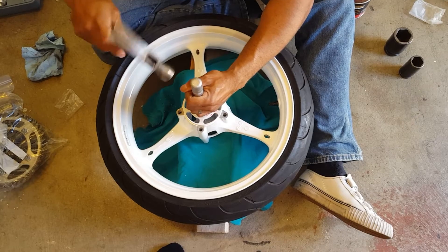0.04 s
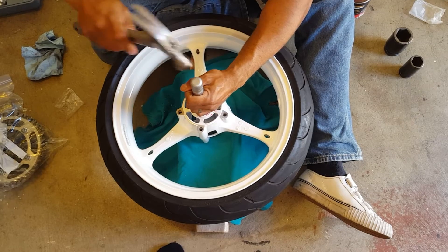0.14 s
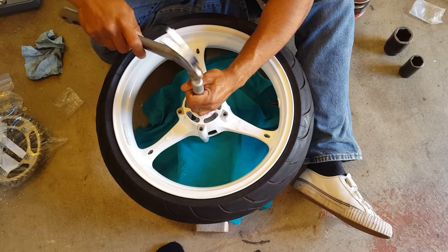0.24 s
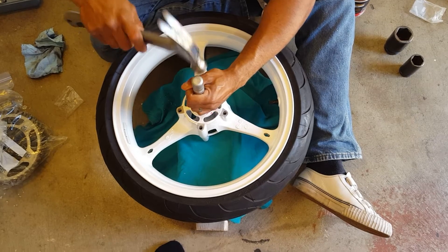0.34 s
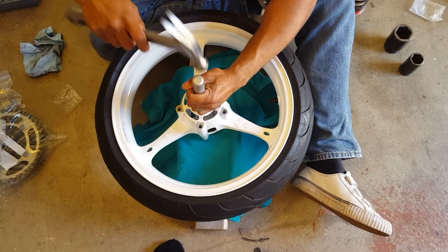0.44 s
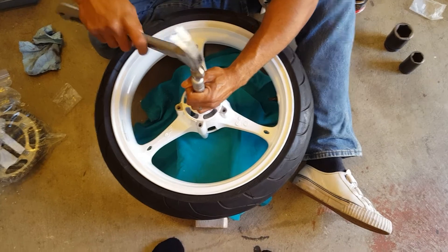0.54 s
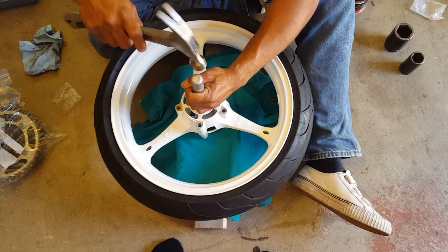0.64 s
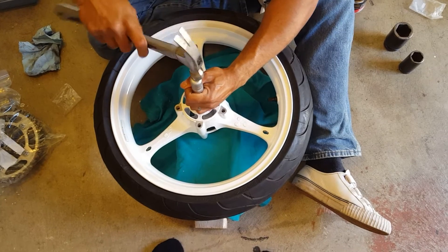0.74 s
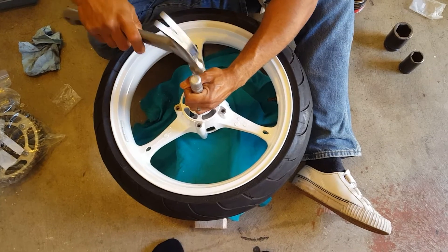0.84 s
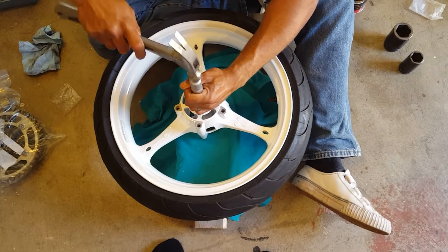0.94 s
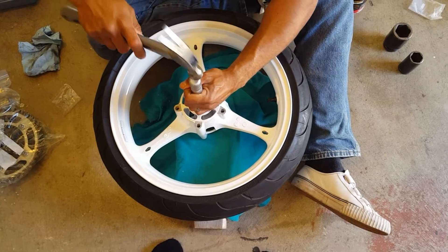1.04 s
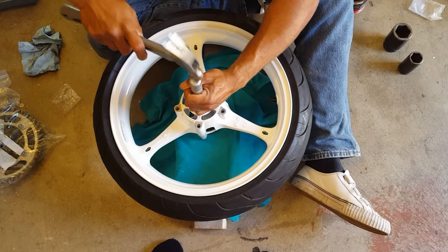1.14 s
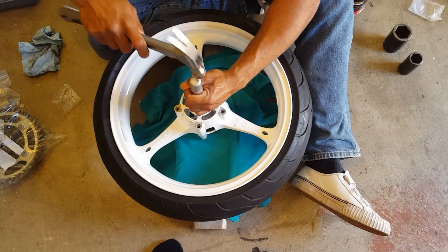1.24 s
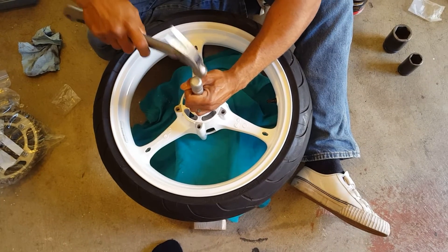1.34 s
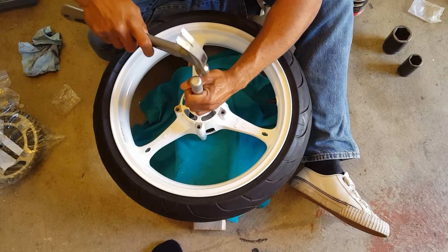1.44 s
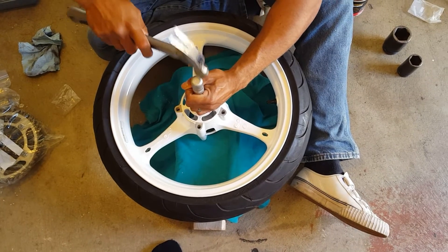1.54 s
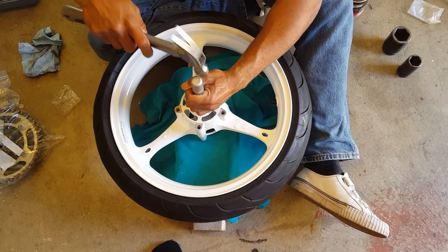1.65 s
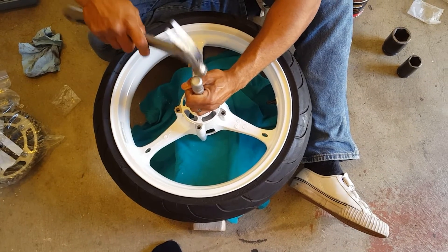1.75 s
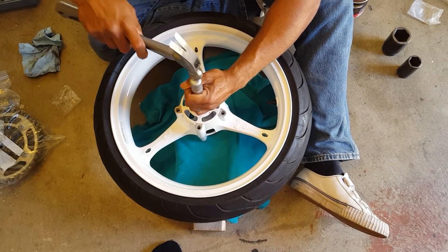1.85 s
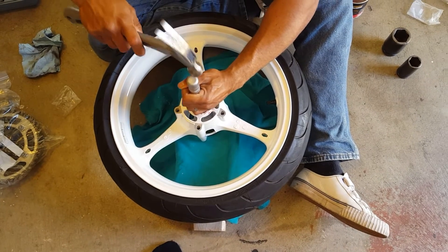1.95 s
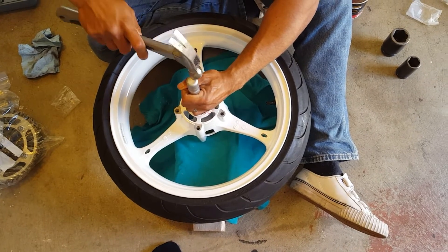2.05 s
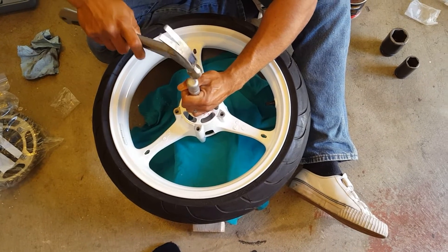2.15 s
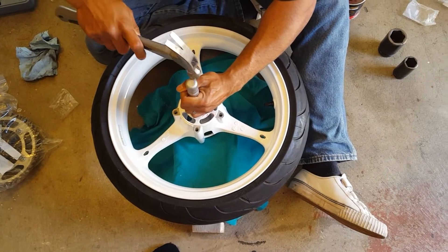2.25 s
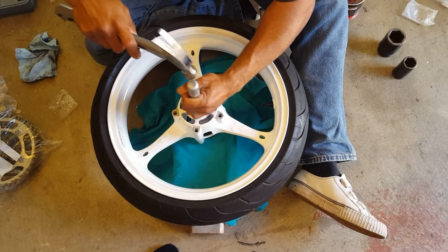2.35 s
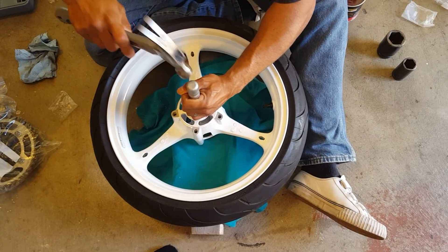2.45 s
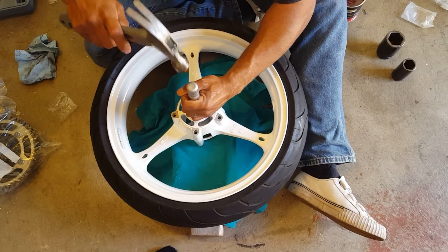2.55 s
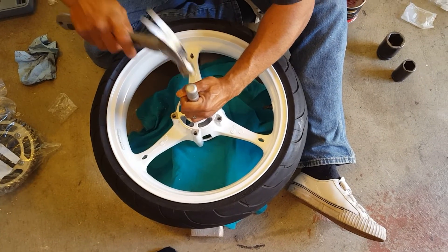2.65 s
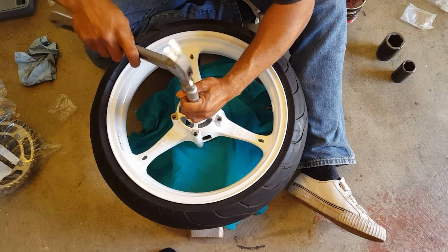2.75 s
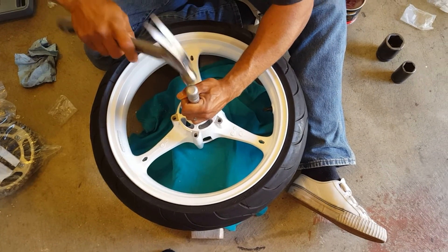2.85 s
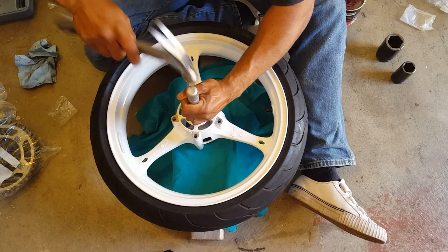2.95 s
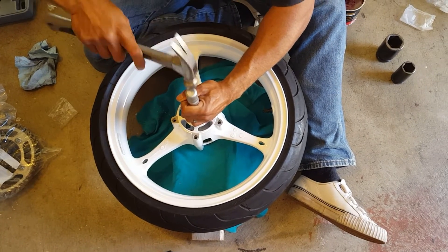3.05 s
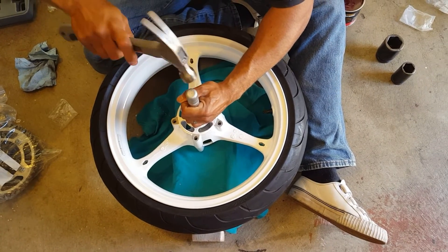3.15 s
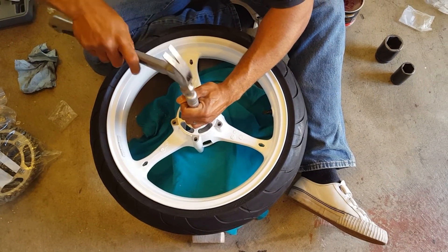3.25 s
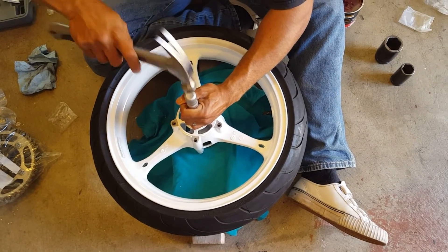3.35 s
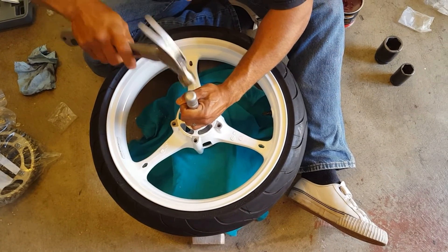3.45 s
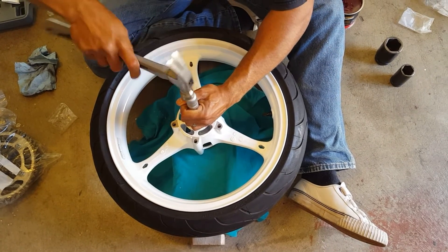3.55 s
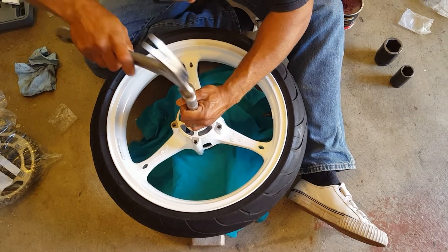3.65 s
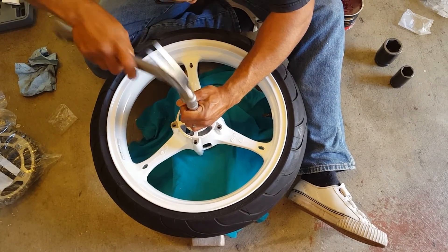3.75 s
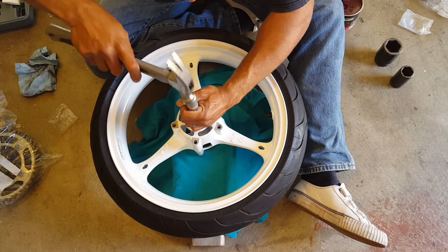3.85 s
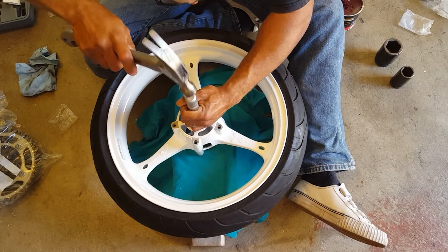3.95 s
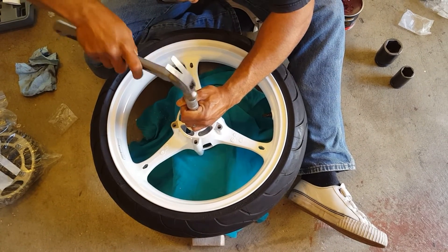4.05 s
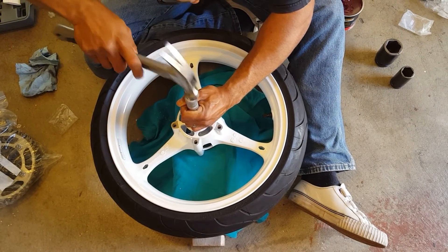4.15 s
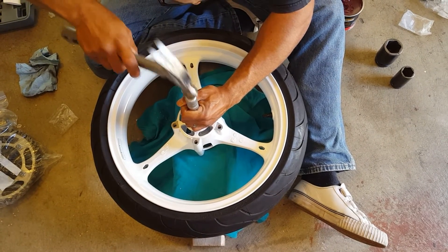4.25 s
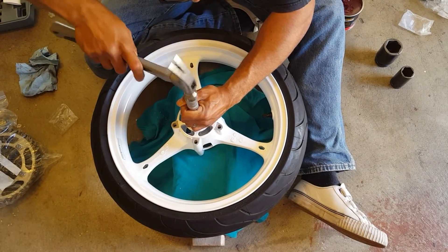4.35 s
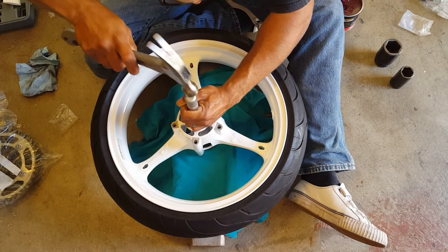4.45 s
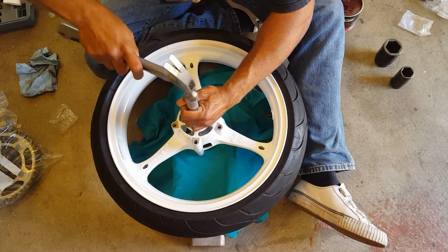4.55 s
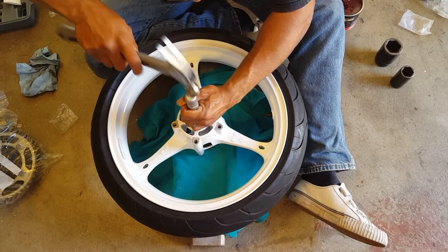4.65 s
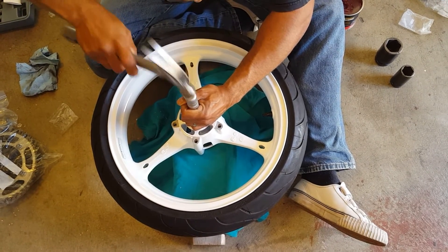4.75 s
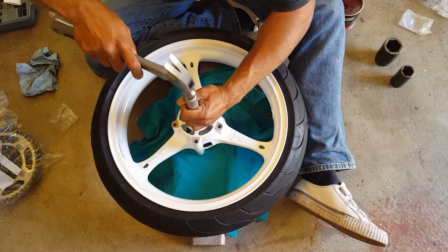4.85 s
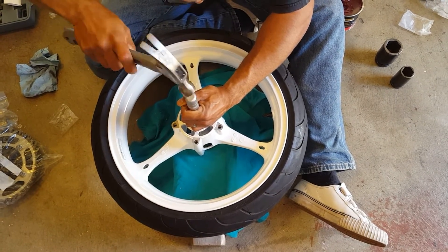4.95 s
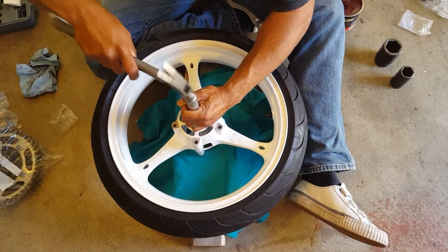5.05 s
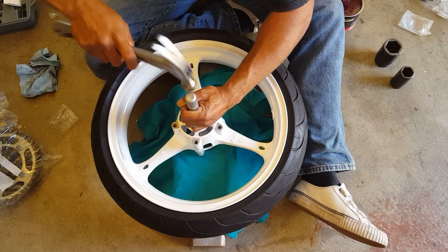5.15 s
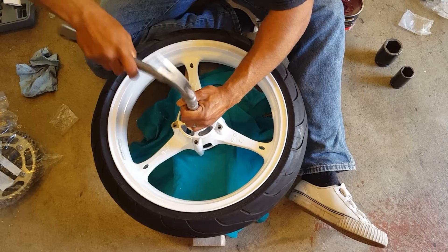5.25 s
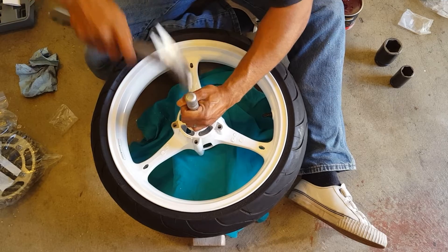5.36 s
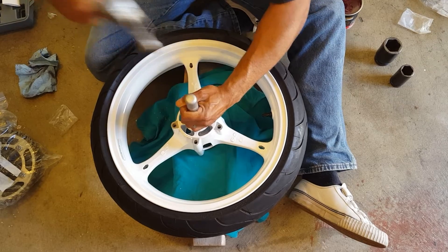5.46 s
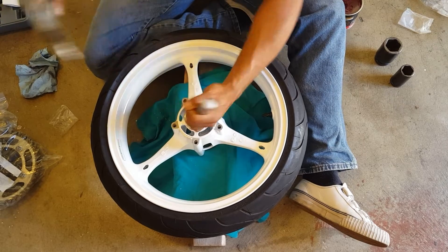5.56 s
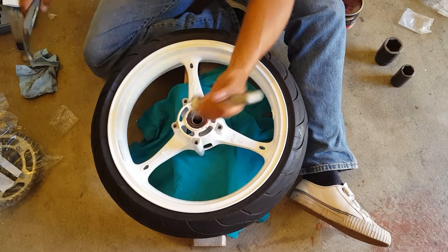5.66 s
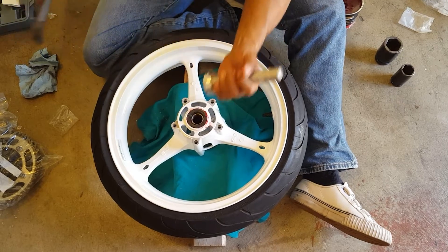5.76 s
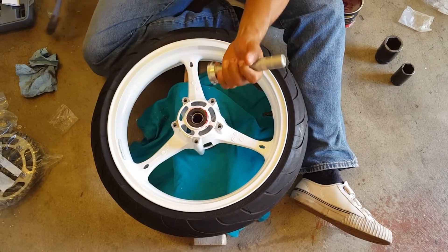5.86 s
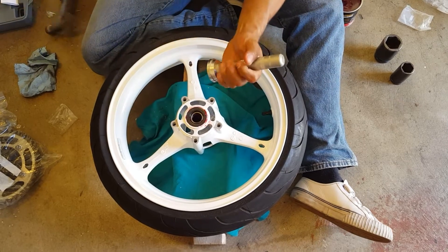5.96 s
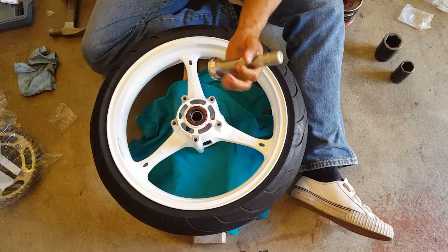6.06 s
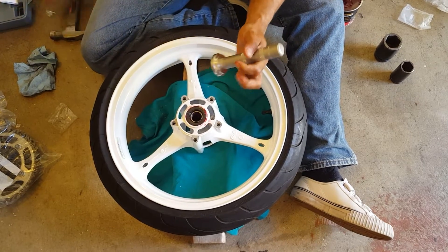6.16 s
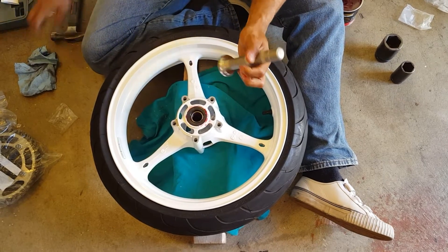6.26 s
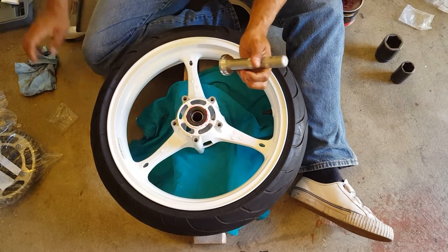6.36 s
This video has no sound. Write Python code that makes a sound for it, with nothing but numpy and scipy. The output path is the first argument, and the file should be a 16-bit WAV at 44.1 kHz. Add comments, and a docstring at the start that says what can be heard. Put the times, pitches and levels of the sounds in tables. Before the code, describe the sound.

For the first half second, small birds chirp and whistle in downward slurs outside, over the low hum and road noise of a distant engine that sinks in pitch and is gone by about 2 seconds. At 0.5 a hammer strikes a hand-held metal driver on a wheel hub, loud and close. Eight blows follow about every 0.2 seconds until 2.0, hollow, with hub clank, spoke boom and short metallic ring. A faint tick at 2.3 fills the pause. From 2.8 to 5.3 eleven more blows land about every quarter second, growing harder, tighter and more solid, with some tyre thump. Each crack gets quick echoes and a diffuse garage tail under a second long. The tail fades, very faint birds sing from 5.7, and from 6.0 to 6.25 the loose driver clinks lightly, brightest near 6.12. Stereo, hard peaks clipped.

```python
"""Hammering a wheel seal home

A claw hammer taps a hand-held metal driver in two runs, seating a seal in the hub of a motorcycle wheel.
Shaped noise makes each crack, fading tones ring the driver and wheel, and a smeared pulse makes the knock.
The knock hardens as the seal goes home, and a bare garage answers with echoes and fading noise.
Then the driver is lifted out and clinks in the hand: short noise ticks with fading tones.
Outside, birds sing in gliding tones, and a distant engine, two tones over road noise, fades."""
import sys
import numpy as np
from scipy import signal
from scipy.fft import rfft, irfft
from scipy.io import wavfile
from scipy.ndimage import uniform_filter1d

SR = 44100
rng = np.random.default_rng(int(sys.argv[2]) if len(sys.argv) > 2 else 0)


def store_pcm(level_fs):
    """Save levels as 16-bit WAV."""
    pcm = np.round(np.clip(level_fs, -1, 1) * 32767).astype(np.int16)
    wavfile.write(sys.argv[1], SR, np.atleast_2d(pcm).T)


N = 282284  # length of the scene in samples

# Levels in the tables are relative: each sound is scaled again when it is mixed.
# road noise that goes with the engine: (frequency [Hz], level [dB])
ROAD_SPECTRUM = [(25, -25), (60, -2), (130, -4), (260, -7.5), (600, -17.5), (1500, -23.5), (3000, -14),
                 (4500, -38.5), (6300, -38.5), (7500, -31), (9500, -53), (12500, -42), (16000, -45.5)]
# the still air: (frequency [Hz], level [dB])
AIR_SPECTRUM = [(25, -19.5), (70, -2), (200, -6), (600, -6), (2500, -22.5), (5000, -25), (16000, -46)]
# one rising bird syllable: (time from its start [s], pitch [Hz], level [dB])
SYLLABLE_POINTS = [(0, 1630, -22.5), (0.016, 1710, -5.5), (0.036, 1796, 0.5), (.041, 2180, 8.5),
                   (0.046, 2645, 2.5), (0.062, 2874, -1.5), (0.075, 3110, 4), (0.081, 3960, -4.5)]
# runs of evenly spaced syllables: (start [s], end [s], level [dB])
CHIRP_RUNS = [(.005, .5, -51), (5.696, 6.05, -62.5)]
# slurred bird whistles: (time [s], length [s], first pitch [Hz], last pitch [Hz], level [dB])
WHISTLES = [(0.001, .036, 2650, 2640, -52), (.222, 0.051, 2950, 2510, -46),
            (0.243, 0.073, 2472, 2377, -36.5), (0.286, 0.047, 2352, 2070, -33.5),
            (0.344, 0.053, 1980, 2173, -40.5), (0.407, 0.077, 2200, 2010, -45),
            (5.845, 0.07, 2615, 2660, -60), (5.893, 0.155, 2353, 2280, -55.5),
            (5.988, 0.14, 3370, 3385, -62)]
# garage reverberation: (frequency [Hz], level [dB], time to fall 60 dB [s],
# likeness of left and right [0-1], left over right before halving and mirroring [dB])
GARAGE_BANDS = [(57.4, -27.5, 0.37, .9, 6.5), (160.3, -3, 0.53, 1, -1.5), (355, 5, 0.46, 0.96, 0.5),
                (720, -2, 0.75, 0.4, 0.5), (980, -4, 0.71, .2, 3), (1380, 1.5, 0.74, .05, 4.5),
                (2307, 0, 0.73, 0.06, -3.5), (4700, 2.5, 0.6, 0, 4), (6460, 1, 0.62, 0.1, -1),
                (10100, -9, 0.36, 0.01, 9), (15300, -3, .35, 0.3, 5.5)]
# hammer blows: (time [s], force [dB], brightness [dB], driver's middle ring [dB], low ring [dB],
# high ring [dB], tyre thump [dB], wheel boom [dB], hub clank [dB], snap [dB])
BLOWS = [ (0.5219, 4.5, -0.5, 4.5, 1.5, -3.5, -6.5, 0, -0.5, 1),
         (0.758, .5, -1, 6, 1.5, -9.5, -7.5, 2.5, 0, -1.5),
         (0.9824, -2, 0.5, -6, -14.5, 3, -9.5, 2.5, 2, 4),
         (1.1890, -1.5, -0.5, 7.5, 2, 14, -17, 2.5, 0, -2),
         (1.3994, 0.5, -10, -25.5, 2, 1.5, -13.5, 1.5, -1.5, -7.5),
         (1.5962, -5, -2, 3, -3.5, -0.5, -21, 6.5, 1, -0.5),
         (1.812, -.5, -2.5, -1, -1, 6.5, -5.5, -1, -6, 3), (2.0303, -6.5, 2, 6.5, 12, -2, -26, 3.5, -3, 4),
         (2.2919, -25, -24, -14, -18, -16, -21.5, 4, -15, 3),
         (2.783, -3, 0.5, 6.5, 2, 10, -6, -1.5, 2.5, 1),
         (3.0476, 0.5, -3, -22, 4.5, 5, -11, -0.5, 3.5, 0.5),
         (3.3124, 0, -2.5, -14.5, 3.5, 3.5, 0, 2.5, 3.5, -2.5),
         (3.5790, 1, -1.5, -15.5, 0, 9.5, 1.5, 2.5, 4, -0.5), (3.8399, 1.5, -2, -6.5, 4, 8, 0, 4.5, 0.5, 7),
         (4.1024, 1.5, -0.5, -17, 2.5, 9, -11, 0.5, 2.5, -2),
         (4.3525, 1.5, -1, -14, 5, 3.5, -4.5, 1.5, 2, 1),
         (4.598, 2, -0.5, -23.5, 4, 0.5, -1.5, 2, 1.5, 0.5), (4.8465, 3, -1, -9, -9, -2, 5, -0.5, 3, 3),
         (5.0846, 4, -0.5, -12.5, -9, -13.5, 4.5, -1.5, -1.5, -0.5),
         (5.323, 2.5, -4, 0, -30, 1.5, -13, 1.5, -2.5, 5)]
# how far the seal is seated: (time [s], seating [0 sliding - 1 home])
SEATING = [(.52, 0.097), (1.6, 0.13), (2.78, 0.15), (3.05, 0.61), (3.84, 0.87), (4.35, 1), (5.08, 1),
           (5.32, 0.97)]
# colour of a blow while the seal still slides: (frequency [Hz], level [dB])
SLIDING_COLOUR = [(100, -18.5), (160, -6), (250, -3), (400, 4), (750, 5), (1050, -1.5), (1400, -4),
                  (1600, -6), (2100, 5), (2700, -6.5), (3300, -6), (4400, -9), (5200, -11.5), (6000, -6),
                  (7300, -6.5), (8100, -10.5), (8700, -32), (9900, -35.5), (12500, -20.5), (16000, -31)]
# colour of a blow once the seal is home: (frequency [Hz], level [dB])
SEATED_COLOUR = [(100, -26.5), (170, -8.5), (260, -15.5), (345, -3), (420, -1.5), (750, 2.5), (1150, 3),
                 (1450, -1), (1740, -9.5), (2000, -4.5), (2250, -6), (2850, -6), (3250, -14), (3900, -16),
                 (5600, -9.5), (7400, -6.5), (8700, -10.5), (9900, -38), (12000, -19), (16000, -31.5)]
# broad resonances each blow stirs, in the order boom, clank, snap: (frequency [Hz], width [octaves])
FORMANTS = [(300, 0.28), (2050, 0.19), (3350, 0.12)]
# tones of the driver, in low, middle and high groups plus an overtone of the low group:
# (frequency [Hz], level [dB], time to fall 60 dB [s])
DRIVER_MODES = [(4662, -10, .036), (4805, -9.5, .036), (5780, -6, .018), (5945, -1.5, .033),
                (6015, -3, .033), (6170, -4.5, .028), (7240, -8, .025), (7345, -4.5, .04),
                (7480, -10, .025), (8790, -20, .06)]
# borders between those groups: (frequency [Hz])
DRIVER_GROUP_EDGES = [5300, 6700, 8200]
# tones of the wheel, booming spokes below and ringing rim above:
# (frequency [Hz], level [dB], time to fall 60 dB [s])
WHEEL_MODES = [(147.5, -25, 0.095), (165.4, -16.5, 0.13), (243, -18.5, 0.04), (280, -26.5, 0.041),
               (360, -7.5, 0.087), (402, -6, 0.08), (524, -20, 0.034), (616, -11, 0.06), (736, -16, 0.11),
               (1234, -12, 0.13), (1434, -9, 0.032), (1908, -19, 0.15), (1965, -12, 0.039),
               (2264, -18, 0.067), (2496, -11, 0.025), (2535, -16.5, 0.11), (2842, -21.5, 0.031)]
# clank of the hub around a seal that still slides: (frequency [Hz], level [dB], time to fall 60 dB [s])
HUB_MODES = [(2300, 0, 0.0047), (2220, 5, 0.033)]
# the clank's returns from the roof, lower the second time: (delay [s], frequency [Hz], level [dB])
ROOF_CLANGS = [(.037, 1975, -19.5), (.063, 1901, -22.5)]
# early echoes off the floor, the ceiling and the far wall: (delay [s], gain [times])
EARLY_ECHOES = [(.0083, 0.32), (0.0148, 0.23), (0.0646, .14)]
# the loose driver head clinking on its handle:
# (time [s], level [dB], low ring [dB], high ring [dB], brightness [dB])
CLINKS = [(2.2917, -16, -20, -19, -12), (6.033, -27.5, -6, -10, -26), (6.073, -27.5, -5, -7, -24.5),
          (6.12, -8.5, 10, 13, 8), (6.1504, -31, 15, 11, -3), (6.176, -14, -6, 1, 2),
          (6.199, -19.5, 19, 9, 13), (6.2024, -13.5, 10, 8, 5), (6.2325, -36, 30, 10, 2),
          (6.249, -22, 19, 8, 17.5)]
# colour of a clink: (frequency [Hz], level [dB])
CLINK_COLOUR = [(150, -22), (600, -7), (1500, -9.5), (2700, -6), (4000, -10.5), (7400, -21), (9900, -40.5),
                (12500, -35), (16000, -40)]
# colour of the left microphone against the right: (frequency [Hz], left over right [dB])
MICROPHONE_BALANCE = [(100, 0), (400, 1.5), (800, -0.5), (1300, -5), (2300, -5), (3200, -7), (4600, -3.5),
                      (8000, 1.5), (14000, 4.5)]

ENGINE_START_HZ, ENGINE_SAG_HZ_PER_S = 78.3, 1.7  # the distant engine's firing rate sinks steadily
ENGINE_START_DB, ENGINE_FADE_DB_PER_S = -52, 5.5  # shared level of hum and road noise; it recedes steadily
ENGINE_GONE_S, ENGINE_GONE_DB_PER_S = 1.68, 17.5  # from this moment it also drops out of earshot
CHIRP_PERIOD_S = 0.141
WHISTLE_ATTACK_S, WHISTLE_RISE_DB, WHISTLE_FADE_DB = 0.013, 19, 8  # a quick swell, then a slow fade
WHEEL_SLIDING_DB, WHEEL_HOME_DB = -9.5, -21.5  # spoke boom at first, and once the hub is stiff
WHEEL_STIFF_AT = 0.3  # share of seating at which the seal has stiffened the hub
RIM_FROM_HZ, RIM_SLIDING_DB, RIM_HOME_DB = 1000, -21.5, -17  # a home seal passes blows into the wheel
WHEEL_RISE_S = 0.0007  # the wheel's tones swell in softly over a fraction of a millisecond
CLANG_RISE_S, CLANG_T60_S = 0.0029, 0.066
DRIVER_DB, ROOM_WANDER = -16.5, 0.5  # driver ring under a blow; how much each blow's room shares vary
HIT_SIZE, LEAD = 32768, 256  # samples in one strike, and samples kept free before its contact
TOP_HZ = 16100

T = np.arange(N) / SR
AGE = np.maximum(np.arange(HIT_SIZE) - LEAD, 0) / SR  # seconds since contact
HIT_HZ = np.fft.rfftfreq(HIT_SIZE, 1 / SR)
TREBLE = np.clip(np.log(HIT_HZ / 2500 + 1e-9) / np.log(3), 0, 1)  # the shelf that brightness lifts


def undb(db):
    """Turn decibels into gain."""
    return 10 ** (np.asarray(db) / 20)


def along(hz, table, axis=1):
    """Read a table column, spacing frequencies the way the ear spaces pitch."""
    rows = np.array(table, float)
    return np.interp(np.log(hz + 1), np.log(rows[:, 0]), rows[:, axis])


def pan(db):
    """Left and right gains for a level difference."""
    return undb(np.array([[db], [-db]]) / 2)


def colour(x, db):
    """Filter with a gain per frequency, letting nothing sound before its cause."""
    # folding the cepstrum puts the whole response after the impulse
    cepstrum = irfft(np.log(undb(db)))
    cepstrum[1:HIT_SIZE // 2] *= 2
    cepstrum[HIT_SIZE // 2 + 1:] = 0
    return irfft(rfft(x) * np.exp(rfft(cepstrum)))


def even(x, size):
    """Spectrum of a noise with its broad random humps levelled."""
    spectrum = rfft(x)
    power = uniform_filter1d(np.abs(spectrum) ** 2, size)
    return spectrum / np.sqrt(power)


def noise(spectrum, spread):
    """Steady stereo noise: a shared middle part of unit level, plus a part opposite on each side."""
    gain = undb(along(np.fft.rfftfreq(N, 1 / SR), spectrum))
    mid, side = irfft(rfft(rng.standard_normal((2, N))) * gain, N)
    return (mid + spread * side * np.array([[1], [-1]])) / mid.std()


def street():
    """An engine hums as two tones over road noise, sinking away and leaving still air."""
    phase = 2 * np.pi * np.cumsum(ENGINE_START_HZ - ENGINE_SAG_HZ_PER_S * T) / SR
    extra_fade_db = ENGINE_GONE_DB_PER_S * np.maximum(T - ENGINE_GONE_S, 0)
    level_db = ENGINE_START_DB - ENGINE_FADE_DB_PER_S * T - extra_fade_db
    hum = np.sin(phase) + undb(-5.5) * np.sin(2 * phase)
    road = noise(ROAD_SPECTRUM, spread=0.55)
    air = noise(AIR_SPECTRUM, spread=0.6)
    return undb(level_db) * (undb(3.0) * hum + undb(1.0) * road) + undb(-69.5) * air


def whistle(points, waver=0.005):
    """A near-pure bird note gliding through its points with a slight tremor of pitch."""
    s, hz, db = np.transpose(points)
    t = T[(T >= s[0]) & (T < s[-1])]
    tremor = np.interp(t, np.linspace(s[0], s[-1], num=16), rng.standard_normal(16))
    pitch = np.interp(t, s, hz) * (1 + waver * tremor)
    tone = np.sqrt(2) * np.sin(2 * np.pi * np.cumsum(pitch) / SR)
    note = tone * undb(np.interp(t, s, db)) * signal.windows.tukey(len(t), 0.1)
    start = np.searchsorted(T, s[0])
    return np.pad(note, (start, N - start - len(t)))


def slur(s, length, first_hz, last_hz, db):
    """One whistle: a straight glide that swells and fades."""
    ages = np.array([0, min(WHISTLE_ATTACK_S, length / 2), length])
    hz = first_hz + (last_hz - first_hz) * ages / length
    levels_db = [db - WHISTLE_RISE_DB, db, db - WHISTLE_FADE_DB]
    return whistle(np.transpose([s + ages, hz, levels_db]))


def birds():
    """Sum the birds' gliding tones: runs of rising chirps, and slurred whistles."""
    song = np.zeros(N)
    for start, end, db in CHIRP_RUNS:
        for s in np.arange(start, end, CHIRP_PERIOD_S):
            song += whistle(np.array(SYLLABLE_POINTS) + [s, 0, db])
    for row in WHISTLES:
        song += slur(*row)
    return song


def garage(x, count=24, size=130):
    """Many mingled echoes, made from noise, build up quickly and die away band by band."""
    t = np.arange(SR) / SR
    hz = np.fft.rfftfreq(SR, 1 / SR)
    centres = np.geomspace(GARAGE_BANDS[0][0], GARAGE_BANDS[-1][0], count)
    # level the noise under a fading weight, so no single pitch stands out
    fade = np.exp(-10 * t)
    weighted = np.pad(rng.standard_normal((2, SR)) * fade, ((0, 0), (0, SR)))
    echoes = irfft(even(weighted, size))[:, :SR] / fade
    white = rfft(echoes / echoes.std())
    response = np.zeros((2, SR))
    for centre, pick in zip(centres, np.eye(count)):
        db, t60, alike, lean_db = (along(centre, GARAGE_BANDS, axis=k) for k in range(1, 5))
        band = np.interp(np.log(hz + 1), np.log(centres), pick)
        mid, side = irfft(white * band, SR)
        pair = np.sqrt(1 + alike) * mid + np.sqrt(1 - alike) * side * np.array([[1], [-1]])
        response += undb(db) * pan(lean_db) * pair * np.exp(-np.log(1000) * t / t60)
    response *= 1 - np.exp(-t / 0.011)
    return undb(-35) * signal.fftconvolve(x[None], response, axes=1)[:, :N]


def burst(rise_s, fall_s, size=400):
    """Crowded metal tones, made as noise dying within milliseconds, different towards each side."""
    swell = (1 - np.exp(-AGE / rise_s)) * np.exp(-AGE / fall_s)
    return irfft(even(rng.standard_normal((2, HIT_SIZE)) * swell, size)) * (AGE > 0)


def ring(modes, scatter_db, detune=0.0007, gains_db=0):
    """Fading tones with their own extra gains; level and pitch vary a little at each strike."""
    hz, db, t60 = np.array(modes, float).T[:, :, None]
    pitch_chance, level_chance = rng.standard_normal((2, len(modes), 1))
    sign = (-1) ** np.arange(len(modes))[:, None]
    tones = np.sin(2 * np.pi * hz * (1 + detune * pitch_chance) * AGE)
    waves = tones * np.exp(-np.log(1000) * AGE / t60)
    level_db = db + np.reshape(gains_db, (-1, 1)) + scatter_db * level_chance
    return np.sum(sign * undb(level_db) * waves, axis=0)


def add(track, sound, s):
    """Mix a strike into a track at its time, its far end faded out."""
    start = int(round(s * SR)) - LEAD
    fade = np.minimum(np.linspace(2, 0, HIT_SIZE), 1) ** 2
    part = (sound * fade)[..., :N - start]
    track[..., start:start + part.shape[-1]] += part


def bending_wave(travel_s):
    """An impulse after crossing the spokes: low notes arrive later; travel_s is the delay at 1 kHz."""
    turns = HIT_HZ * LEAD / SR + 2 * travel_s * np.sqrt(HIT_HZ * 1000)
    return irfft(np.exp(-2j * np.pi * turns))


def formants(gains_db):
    """Bell-shaped lifts or dips, in dB, where broad resonances speak."""
    total_db = np.zeros(len(HIT_HZ))
    for db, (hz, width) in zip(gains_db, FORMANTS):
        octaves_away = np.log2((HIT_HZ + 1) / hz)
        total_db += db * np.exp(-np.square(octaves_away / width) / 2)
    return total_db


def crack(seated, shape_db):
    """Steel meets the driver in a noise burst; a later one joins as the seal seats."""
    # with the seal home, the driver bottoms on the hub just after the first contact
    bottoming = np.roll(burst(rise_s=0.0015, fall_s=0.0069), int(0.002 * SR), axis=1)
    first = burst(rise_s=0.00031, fall_s=0.0034)
    contact = (1 - 0.13 * seated) * first + 0.52 * seated * bottoming
    return undb(21.5) * colour(contact, shape_db)


def knock(shape_db):
    """The blow crosses the spokes as a smeared pulse, plus a later one of chance strength."""
    # no two blows land quite square
    late = 0.29 * rng.standard_normal() * bending_wave(travel_s=0.00345)
    return undb(17.0) * colour(bending_wave(travel_s=0.00177) + late, shape_db)


def driver(low_db, middle_db, high_db):
    """The driver's ring; the grip and the point of contact decide which group of tones speaks."""
    group = np.digitize(np.array(DRIVER_MODES)[:, 0], DRIVER_GROUP_EDGES)
    gains_db = np.array([low_db, middle_db, high_db, low_db])[group]  # the overtone follows the low group
    return ring(DRIVER_MODES, scatter_db=1.5, detune=0.003, gains_db=gains_db)


def wheel(seated, boom_db):
    """Spokes boom less and the rim rings more as the seal stiffens the hub."""
    spokes_db = np.interp(seated, [0, WHEEL_STIFF_AT], [WHEEL_SLIDING_DB, WHEEL_HOME_DB])
    rim_db = RIM_SLIDING_DB + seated * (RIM_HOME_DB - RIM_SLIDING_DB)
    gains_db = np.where(np.array(WHEEL_MODES)[:, 0] < RIM_FROM_HZ, spokes_db + boom_db, rim_db)
    swell_in = 1 - np.exp(-AGE / WHEEL_RISE_S)
    return swell_in * ring(WHEEL_MODES, scatter_db=3.5, detune=0.009, gains_db=gains_db)


def tyre():
    """Two heavily damped low tones, and a low puff of air that differs at each microphone."""
    thump = undb(-33.0) * ring([(60.5, -3.0, 0.029), (191, -4.5, 0.025)], scatter_db=9.0)
    air = burst(rise_s=0.0024, fall_s=0.0075, size=110)
    puff = undb(13.0) * colour(air, -20 * np.log10(1 + (HIT_HZ / 90) ** 2))
    return thump, puff


def hub_clank(near, s, seated, force_db, clank_db):
    """While the seal slides, the hub mouth beams two short tones up and the roof returns clangs."""
    # force counts twice over: hard blows clank more
    level_db = 2.0 * force_db + clank_db - 17.0
    add(near, undb(level_db) * (1 - seated) * ring(HUB_MODES, scatter_db=1.5, detune=0.011), s)
    for delay, hz, db in ROOF_CLANGS:
        tone = ring([(hz, db, CLANG_T60_S)], scatter_db=0.5, detune=0.0058)
        clang = (1 - np.exp(-AGE / CLANG_RISE_S)) * tone
        add(near, undb(force_db + clank_db / 2) * (1 - seated) * clang, s + delay)


def facing(count):
    """Uneven shares of a blow sent to each wall, leaning to the first; their power sums to one."""
    shares = np.eye(count)[:, :1] + ROOM_WANDER * rng.standard_normal((count, 1))
    return shares / np.linalg.norm(shares)


def hammer(split_hz=1400, count=4):
    """Each blow strikes driver, hub, wheel and tyre; returns the near sound and each wall's share."""
    near, sent = np.zeros((2, N)), np.zeros((count, N))
    # the wheel radiates the low notes, the small tools the high ones
    ratio = ((HIT_HZ + 1) / split_hz) ** 4
    low_db, high_db = -10 * np.log10(1 + ratio), -10 * np.log10(1 + 1 / ratio)
    for row in BLOWS:
        s, force_db, bright_db, middle_db, ping_db, chime_db, thump_db, boom_db, clank_db, snap_db = row
        seated = np.interp(s, *np.transpose(SEATING))
        shape_db = (1 - seated) * along(HIT_HZ, SLIDING_COLOUR) + seated * along(HIT_HZ, SEATED_COLOUR)
        shape_db += bright_db * TREBLE + formants([boom_db, clank_db, snap_db])
        contact = crack(seated, shape_db + high_db)
        tool = undb(DRIVER_DB) * driver(ping_db, middle_db, chime_db)
        wheel_ring = wheel(seated, boom_db)
        thump, puff = tyre()
        low_end = undb(thump_db) * (thump + puff)
        blow = contact + knock(shape_db + low_db) + tool + wheel_ring + low_end
        add(near, undb(force_db) * blow, s)
        hub_clank(near, s, seated, force_db, clank_db)
        # the walls gather sound from all directions, so its treble gaps fill in
        spread_db = shape_db + (2.18 + 2.0 * seated) * undb(2 * high_db)
        spread = undb(16.5) * colour(bending_wave(travel_s=0.0015884), spread_db) + 0.4 * contact[0]
        radiated = spread + tool + undb(-6.0) * wheel_ring + undb(thump_db) * thump
        # hand and hammer shift, so each blow lights up the room differently
        add(sent, undb(force_db) * facing(count) * radiated, s)
    return near, sent


def crossover(x, hz):
    """Split into bass and treble, both in step."""
    bass = signal.sosfiltfilt(signal.butter(2, hz, fs=SR, output="sos"), x)
    return bass, x - bass


def reflections(x):
    """Floor, ceiling and far wall each return the sound once, duller."""
    dull, bright = crossover(x, hz=1500)
    returned = dull + 0.13 * bright
    return sum(gain * np.pad(returned, ((0, 0), (int(delay * SR), 0)))[:, :N] for delay, gain in EARLY_ECHOES)


def clinks():
    """The shifted driver rattles in noise ticks and ringing tones; returns near and room sound."""
    near, sent = np.zeros((2, N)), np.zeros(N)
    for s, db, low_db, high_db, bright_db in CLINKS:
        shape_db = along(HIT_HZ, CLINK_COLOUR) + bright_db * TREBLE
        tick = undb(20.0) * colour(burst(rise_s=0.00052, fall_s=0.0019), shape_db)
        tone = undb(-19.5) * driver(low_db, high_db - 6.0, high_db)
        add(near, undb(db) * (tick + tone), s)
        add(sent, undb(db) * (undb(-1.1) * tick[0] + undb(-2.5) * tone), s)
    return near, sent


def scene():
    """Close work and birds through the open door share the room; the street is added directly."""
    outside, song = street(), birds()
    blows, blows_sent = hammer()
    rattle, rattle_sent = clinks()
    left, right = blows + rattle
    near = np.array([left, np.roll(right, 2)])  # the sound reaches the left microphone first
    room = sum(garage(part) for part in blows_sent) + garage(rattle_sent + undb(-1.0) * song)
    return near + reflections(near) + room + undb(-1.5) * song * pan(db=-2.5) + outside


def record(dry):
    """The two microphones differ in colour and clip the hardest peaks; rumble and top are cut."""
    balance_db = along(np.fft.rfftfreq(N, 1 / SR), MICROPHONE_BALANCE)
    heard = irfft(rfft(dry) * undb(np.array([balance_db, -balance_db]) / 2), N)
    heard = signal.sosfilt(signal.butter(2, 38, "high", fs=SR, output="sos"), heard)
    clipped = np.clip(heard, -1, 1)
    return signal.sosfilt(signal.ellip(8, 0.2, 70, TOP_HZ, fs=SR, output="sos"), clipped)


dry = scene()
out = record(dry)
store_pcm(out)
```